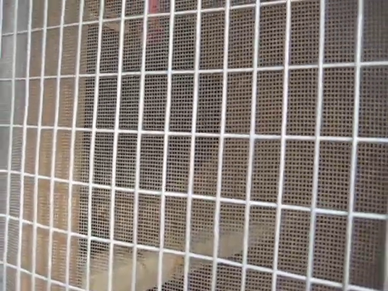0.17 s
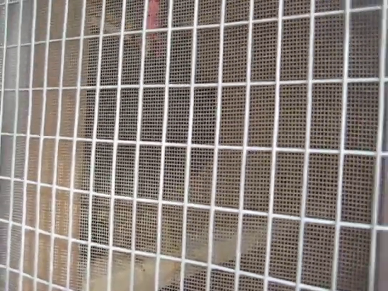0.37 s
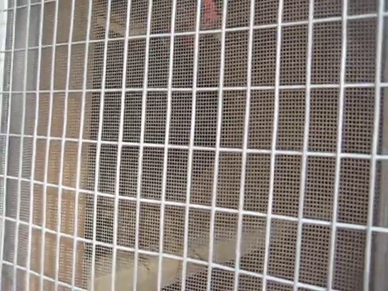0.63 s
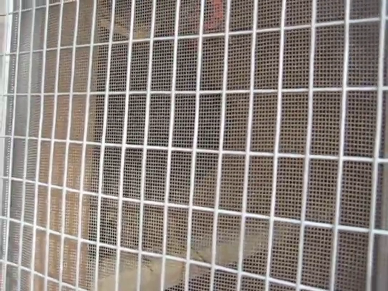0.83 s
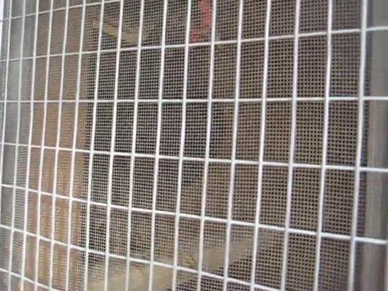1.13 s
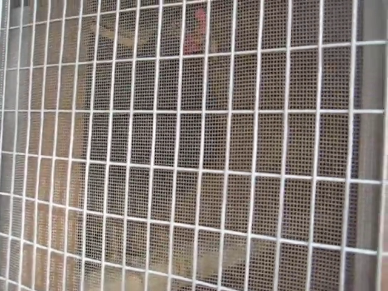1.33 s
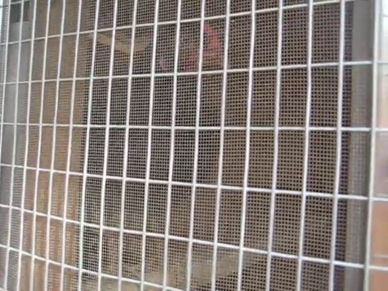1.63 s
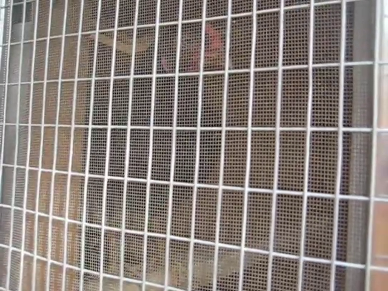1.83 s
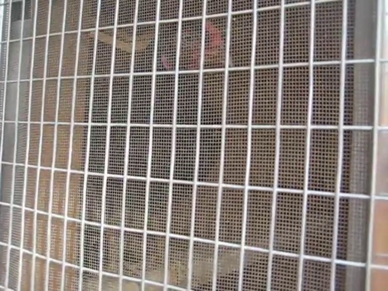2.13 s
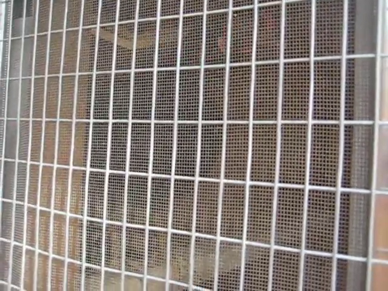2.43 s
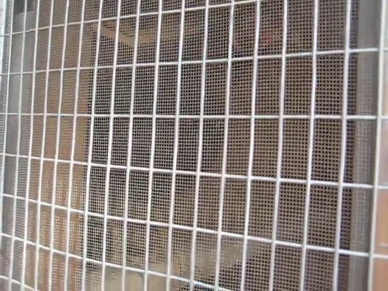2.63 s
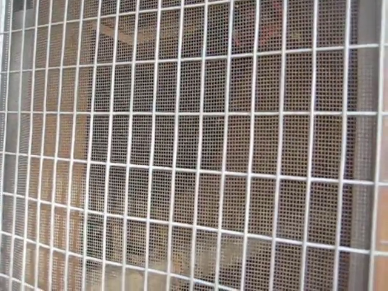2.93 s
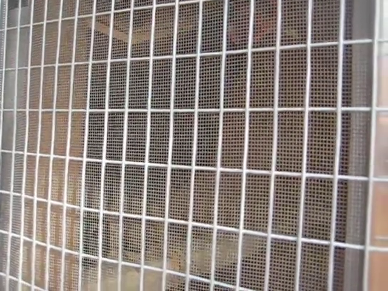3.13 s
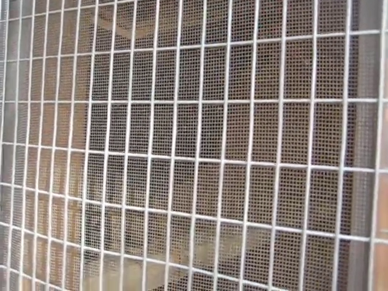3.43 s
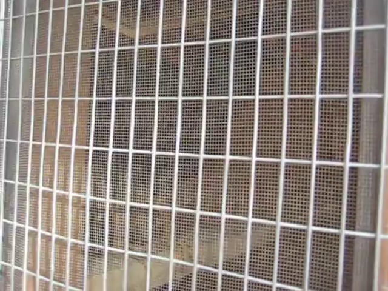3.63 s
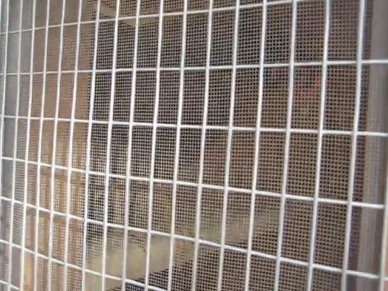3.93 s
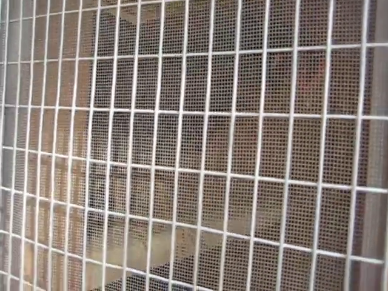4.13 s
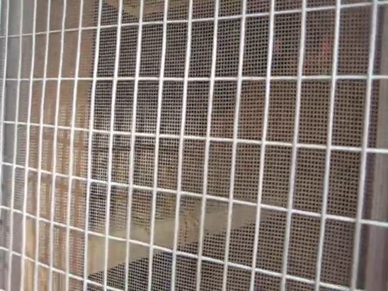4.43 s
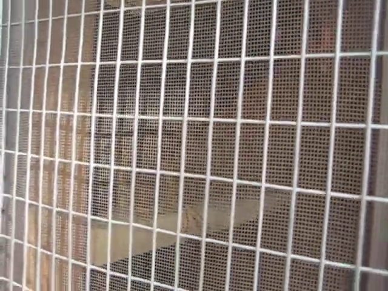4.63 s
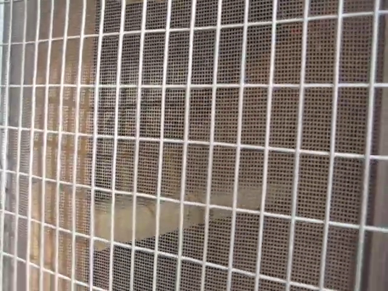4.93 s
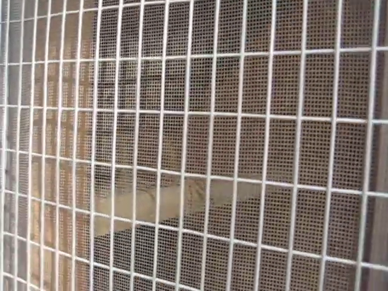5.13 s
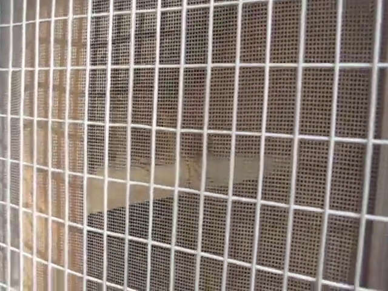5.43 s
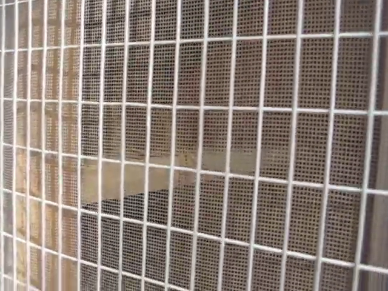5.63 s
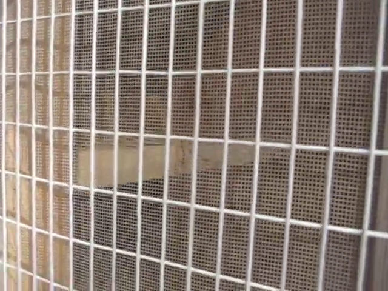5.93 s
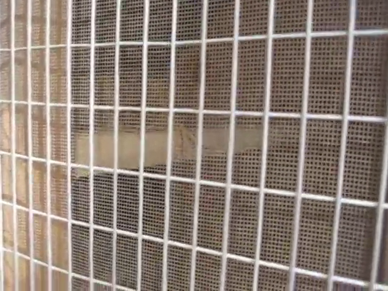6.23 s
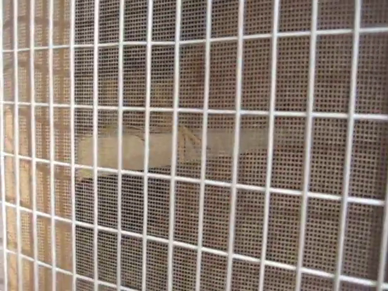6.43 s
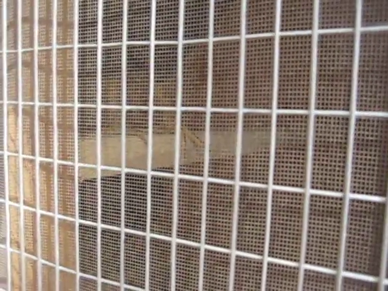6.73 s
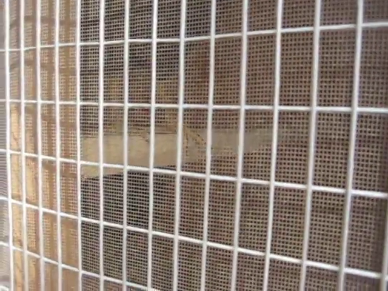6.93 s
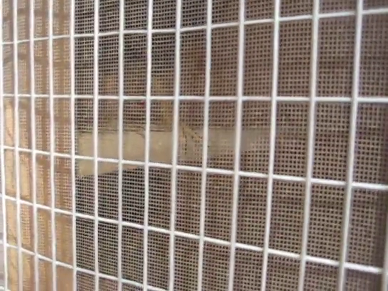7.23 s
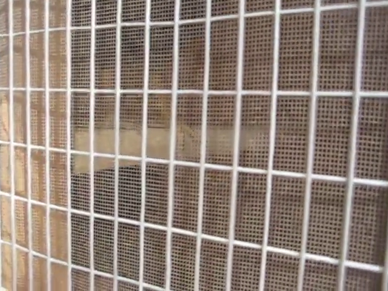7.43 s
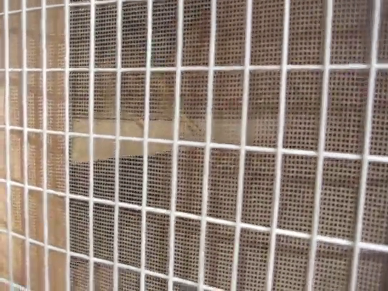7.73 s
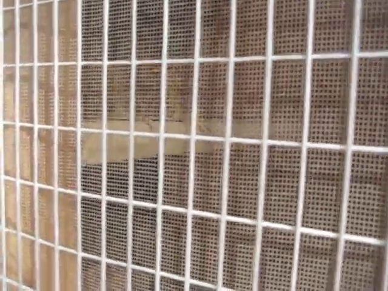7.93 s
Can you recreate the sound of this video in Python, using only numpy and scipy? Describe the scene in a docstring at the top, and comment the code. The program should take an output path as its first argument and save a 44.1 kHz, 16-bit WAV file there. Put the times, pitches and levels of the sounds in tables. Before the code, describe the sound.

Fast hoarse hen clucks give way to cage knocks, thin squeals, harsh squawks and a low growl, with chicks peeping far off.

```python
"""Hens in a small wire-fronted wooden coop. From the start, air noise, an electrical hum and whine and
distant chicks lie under a fast run of hoarse clucks: syrinx pulses filtered by the throat. A nearer chick
peeps, and in a pause beaks and feet knock on the cage. The syrinx then locks into thin squeals, catches
in croaks and, driven harder, breaks into harsh squawks. Low moans and a rasping growl come last.
Throughout, the box reverberates and an automatic gain control ducks each loud call."""
import sys
import numpy as np
from scipy import signal
from scipy.fft import rfft, irfft, next_fast_len
from scipy.io import wavfile
from scipy.ndimage import uniform_filter1d, map_coordinates

SR = 44100
rng = np.random.default_rng(int(sys.argv[2]) if len(sys.argv) > 2 else 0)


def log_audio(samples):
    """Write samples as a 16-bit WAV file to the path given in sys.argv[1]."""
    # one column per channel
    frames = np.atleast_2d(samples).T
    # limit to full scale, then quantise
    limited = np.clip(frames, -1, 1)
    pcm = np.round(limited * 32767).astype(np.int16)
    wavfile.write(sys.argv[1], SR, pcm)


N = 355887
TIME = np.arange(N) / SR


def amp(db):
    """Decibels to amplitude ratio."""
    return 10 ** (np.asarray(db) / 20)


def unit(x):
    """Normalisation to rms 1."""
    return x / np.sqrt(np.mean(x ** 2) + 1e-20)


def along(points, hz):
    """Interpolation of (frequency_hz, value) points on a log axis."""
    known_hz, values = np.transpose(points)
    return np.interp(np.log(hz + 1), np.log(known_hz + 1), values)


def curves(rows, t):
    """Linear interpolation in time of each column after the first."""
    times, *columns = np.transpose(rows)
    return [np.interp(t, times, column) for column in columns]


def span(rows, edge_s):
    """The sample times of a call and its trapezoidal gate."""
    t = np.arange(rows[0][0], rows[-1][0], 1 / SR)
    return t, np.clip(np.minimum(t - t[0], t[-1] - t) / edge_s, 0, 1)


def add(track, start_s, x):
    """Superposition of x on the track."""
    part = track[max(round(start_s * SR), 0):][:len(x)]
    part += x[:len(part)]


def phase_of(pitch_hz):
    """Phase in radians, the integral of frequency."""
    return 2 * np.pi * np.cumsum(pitch_hz) / SR


def wobble(rate, size):
    """Smooth random modulation, rate knots a second."""
    knots = rng.standard_normal(size // 8 + 4)
    return map_coordinates(knots, [np.arange(size) * rate / SR], mode="mirror")


def filtered(x, response):
    """Linear filtering: the spectrum times a frequency response."""
    padded = next_fast_len(len(x) + 8192)
    return irfft(rfft(x, padded) * response(np.fft.rfftfreq(padded, 1 / SR)), padded)[:len(x)]


def resonate(x, modes):
    """Parallel damped resonators of alternating sign: centre_hz, width_hz, gain_db."""
    return filtered(x, lambda f: sum(
        (-1) ** k * amp(db) * 1j * f * width / (hz * hz - f * f + 1j * f * width)
        for k, (hz, width, db) in enumerate(modes)))


def band(x, low_hz, high_hz):
    """Causal band-pass filtering."""
    return signal.sosfilt(signal.butter(3, [low_hz, high_hz], "band", fs=SR, output="sos"), x)


def noise(spectrum, size):
    """Spectral shaping of white noise, at rms 1."""
    return unit(filtered(rng.standard_normal(size), lambda f: amp(along(spectrum, f))))


def retune(x, ratio):
    """Resampling slides pitch and resonances together by a moving ratio."""
    return unit(map_coordinates(x, [np.cumsum(ratio)], mode="mirror"))


def rasp(pitch_hz, rough, size, jitter, shimmer_db, hiss):
    """Jitter and shimmer: syrinx pulses uneven in time and size, each with a puff of turbulence."""
    cycles = np.cumsum(pitch_hz * np.exp(jitter * rough * wobble(400, size))) / SR
    index = cycles.astype(int)
    strength = amp(shimmer_db * rough * np.clip(rng.standard_normal(size), -2, 2))[index]
    puffs = rng.standard_normal(size) * np.exp(-4 * (cycles % 1))
    return unit(strength * (unit(np.diff(index, prepend=0)) + hiss * rough * unit(puffs)))


# outdoor air and hiss: frequency_hz, relative_density_db
AIR_SPECTRUM = [(20, -16), (55, -0.5), (200, 0), (800, -3), (1500, -6), (3000, -14.5), (4400, -12),
                (5800, -18), (6800, -16.5), (7550, -8), (8600, -21.5), (10500, -18), (12500, -28),
                (16000, -37)]
# electrical hum and whine: frequency_hz, level_db
HUM_TONES = [(120, -57), (7560, -57.5), (7590, -81), (11489, -67), (15122, -88), (15150, -68.5)]


def background():
    """A continuous spectrum of outdoor air under a line spectrum of electrical tones."""
    tones = sum(amp(db) * np.sin(2 * np.pi * hz * TIME + 0.19 * wobble(4, N)) for hz, db in HUM_TONES)
    return amp(-42.5) * noise(AIR_SPECTRUM, N) + np.sqrt(2) * tones


# loudness of the distant chicks: time_s, level_db
CHORUS_LEVELS = [(0, -44), (2.3, -45.5), (2.9, -45.5), (4, -45), (5.8, -50), (6.9, -47), (8.07, -47)]


def chicks(count=1000, typical_hz=4605):
    """Incoherent summation: quavering peeps, each a falling arch, merge into a distant chorus."""
    out = np.zeros(N)
    for when, (tune, size, stretch) in zip(rng.random(count), rng.standard_normal((count, 3))):
        length_s = .05 * np.exp(0.27 * stretch)
        progress = np.arange(0, 1, 1 / (SR * length_s))
        quaver = .02 * np.sin(2 * np.pi * 5 * progress)
        arch = 1 - 0.337 * (progress - .35) ** 2
        pitch_hz = typical_hz * (1 + .028 * tune + quaver) * arch
        add(out, when * N / SR, amp(2.3 * size) * np.sin(np.pi * progress) * np.sin(phase_of(pitch_hz)))
    return amp(curves(CHORUS_LEVELS, TIME)[0] + wobble(3.7, N)) * unit(out)


# clucks: start_s, rise_s, length_s, pitch_hz, roughness (0-1), relative_level_db, brightness_db
CLUCK_CALLS = [(0, 0.00067, 0.053, 385.2, 0.91, -19.5, -5), (0.143, 0.011, 0.064, 374.4, 0.73, -15.5, -3.5),
               (0.309, 0.014, .059, 347, 0.86, -16.5, -2), (.482, 0.013, 0.063, 344.6, 0.91, -18, 0),
               (0.661, .016, .072, 341.4, 0.91, -19, -5.5), (0.854, 0.025, .066, 346.5, 0.8, -17.5, -3),
               (1.1, 0.021, 0.07, 369, 0.77, -18, -4), (1.231, .01, .048, 347.6, .85, -17, -8),
               (1.425, 0.024, 0.064, 373, 0.69, -18, -5), (1.66, 0.023, .062, 400, .88, -23.5, -2.5),
               (1.788, 0.033, 0.037, 361.5, 0.42, -14, -7)]
# low, upper (at full gape) and shrill resonances: centre_hz, width_hz, gain_db
CLUCK_LOW_FORMANTS = [(832, 336, -2.5), (1280, 560, -1)]
CLUCK_HIGH_FORMANTS = [(2126, 38, 4), (3000, 400, 3.5), (3730, 537, 3), (5790, 730, -11.5),
                       (7600, 2800, -19)]
CLUCK_EDGE_FORMANTS = [(5530, 450, -16), (6800, 500, -1), (8900, 430, 8), (12800, 3700, -15)]


def clucks():
    """Source and filter: hoarse bursts of pulses excite formants, the upper ones more with effort."""
    out, t = np.zeros(N), np.arange(SR // 5) / SR
    for start_s, rise_s, length_s, pitch_hz, rough, level_db, bright_db in CLUCK_CALLS:
        attack = np.minimum(0.079 + 0.81 * t / rise_s, 1)
        release = np.minimum(amp(-480 * (t - length_s)), 1)
        effort = attack * release * amp(-45 * t)
        arch = 1 - .04 * np.minimum((2 * t / length_s - 1) ** 2, 1)
        pulses = rasp(pitch_hz * arch, rough ** 2, len(t), jitter=.125, shimmer_db=4, hiss=.65)
        low = unit(band(resonate(pulses, CLUCK_LOW_FORMANTS), 130, 2000))
        chest = amp(bright_db - 18) * unit(band(pulses, 236, 1260))
        gape = 1 + 0.013 * bright_db  # a wider beak raises the upper resonances
        formants = [(gape * hz, width, db) for hz, width, db in CLUCK_HIGH_FORMANTS]
        high = unit(band(resonate(pulses, formants), 680, 10500))
        shrill = unit(band(resonate(pulses, CLUCK_EDGE_FORMANTS), 4900, 20000))
        edge = amp(0.76 * bright_db - 20) * effort * shrill
        treble = amp(bright_db + 2.5) * effort ** 2 * (high + edge)
        add(out, start_s, amp(level_db) * (effort * (low + chest) + treble))
    return out


# peeps of a nearer chick: start_s, level_db
PEEP_CALLS = [(1.021, -43), (2.2, -48), (2.87, -42), (3.53, -50)]


def peeps(length_s=0.065, top_hz=4400, fall_hz_per_s=6500):
    """Linear chirps: single falling notes stand out from the chorus."""
    out, t = np.zeros(N), np.arange(0, length_s, 1 / SR)
    envelope = np.sqrt(2) * np.sin(np.pi * t / length_s)
    for start_s, level_db in PEEP_CALLS:
        pitch_hz = (top_hz - fall_hz_per_s * t) * (1 + 0.014 * wobble(148, len(t)))
        add(out, start_s, amp(level_db) * envelope * np.sin(phase_of(pitch_hz)))
    return out


# blows on the cage: start_s, level_db, relative_thud_db, t60_s
CAGE_BLOWS = [(2.374, -41, -13, 0.072), (3.022, -64, 15, 0.29), (3.42, -19.5, -27, 0.036),
              (3.649, -41, -9, 0.077), (4.048, -52.5, 14, 0.22), (4.109, -36, -2.5, 0.12),
              (4.158, -29.5, -8, 0.2), (4.175, -39.5, -0.5, 0.2), (4.691, -30, -11, 0.11),
              (4.718, -25, -14, 0.046)]
# struck wire mesh and boards: frequency_hz, relative_density_db
MESH_SPECTRUM = [(530, -47), (900, -19), (1360, 1), (1470, 16), (1600, 13), (2710, 20), (3250, 15.5),
                 (3600, 21), (4000, 13.5), (5720, 7), (14000, -11.5)]
BOARD_SPECTRUM = [(60, -30), (180, 5), (400, 0), (750, 7), (1500, -6.5), (3000, -83)]


def knocks():
    """Impact and exponential decay: beaks and feet rattle the mesh and thud on the boards."""
    out, t = np.zeros(N), np.arange(SR // 4) / SR
    attack = 1 - np.exp(-t / 0.0013)
    for start_s, level_db, thud_db, t60_s in CAGE_BLOWS:
        blow = noise(MESH_SPECTRUM, len(t)) + amp(thud_db) * noise(BOARD_SPECTRUM, len(t))
        add(out, start_s, amp(level_db - 60 * t / t60_s) * attack * blow)
    return out


# one contour for each squeal: time_s, pitch_hz, relative_level_db, relative_overtone_db
SQUEAL_CONTOURS = [
    [(4.2, 1307, -40, -7), (4.324, 1396, -41, -9), (4.41, 1277, -41, -12)],
    [(4.44, 1224, -28, -8), (4.452, 1223, -29, -7), (4.572, 1420, -18, -9), (4.602, 1394, -24, -8),
     (4.624, 1379, -10, -20.5), (4.662, 1382, -19, -22), (4.676, 1318, -30, -13), (4.69, 1190, -31, -12)],
    [(4.845, 1187, -16.5, -25), (4.865, 1225, -15.5, -25), (4.875, 1513, -27, -22), (4.897, 1524, -22, -26),
     (5.023, 1430, -35.5, -9), (5.055, 1470, -28.5, -19), (5.085, 1562, -26, -28),
     (5.131, 1486, -23, -15.5), (5.171, 1526, -27.5, -28), (5.187, 1057, -32.5, -23), (5.2, 1020, -28, -31)],
    [(5.333, 1220, -19, -28), (5.369, 1148, -18, -28), (5.389, 1411, -24, -11), (5.409, 1315, -23, -16),
     (5.455, 1530, -20.5, -6), (5.467, 1365, -23, -11), (5.479, 1270, -14.5, -25), (5.488, 1160, -20, -28)],
]


def squeals(crack_hz_per_s=11800):
    """Self-sustained oscillation: the syrinx holds one high tone, which cracks where it slides fast."""
    out = np.zeros(N)
    for contour in SQUEAL_CONTOURS:
        t, gate = span(contour, edge_s=0.0013)
        pitch_hz, level_db, overtone_db = curves(contour, t)
        slide = np.abs(uniform_filter1d(np.gradient(pitch_hz, t), size=SR // 50))
        rough = np.minimum(0.035 + slide / crack_hz_per_s, 1)
        tremble = .055 * rough * wobble(330, len(t)) + .008 * wobble(50, len(t))
        flutter = amp(4.3 * rough * wobble(222, len(t)))
        phase = phase_of(pitch_hz * (1 + tremble))
        overtones = np.sin(2 * phase) + amp(-23.5 + 26.5 * rough) * np.sin(3 * phase)
        tone = np.sin(phase) + amp(overtone_db - 0.3) * overtones
        add(out, t[0], np.sqrt(2) * gate * flutter * amp(level_db + 1.05) * tone)
    return out


# croaks that lead into a squeal: start_s, length_s, level_db
CROAK_CALLS = [(4.815, 0.038, -21), (5.244, 0.079, -17.5)]
# throat resonances: centre_hz, width_hz, gain_db
CROAK_FORMANTS = [(650, 94, 1), (1174, 200, 3), (1760, 165, -9.5), (2840, 360, -26.5), (3730, 360, -29)]


def croaks(pitch_hz=290, release_db_per_s=900):
    """Aperiodic onset: the voice catches in a low rattle before the tone takes hold."""
    out, t = np.zeros(N), np.arange(SR // 5) / SR
    for start_s, length_s, level_db in CROAK_CALLS:
        effort = np.minimum(t / .002, 1) * amp(-release_db_per_s * np.maximum(t - length_s, 0))
        pulses = rasp(pitch_hz, 1, len(t), jitter=.2, shimmer_db=3, hiss=.6)
        voice = unit(band(resonate(pulses, CROAK_FORMANTS), 450, 5100))
        add(out, start_s, amp(level_db) * effort * voice)
    return out


# squawks: start_s, length_s, top_pitch_hz, relative_level_db, brightness_db, edge_db
SQUAWK_CALLS = [(5.482, 0.0192, 1093, -19, -36, -40), (5.568, 0.2, 1188, -19.5, -12.5, -30),
                (5.762, 0.02, 1121, -20, -17, -38), (5.843, 0.17, 1180, -18, -13, -35),
                (6.089, 0.17, 1131, -20.5, -9.5, -32), (6.339, .155, 1106, -20.5, -7.5, -25.5),
                (6.569, 0.14, 1096, -21, -7, -24), (7.055, 0.092, 1079, -19, -15, -22.5)]
# moments when a squawk locks into a clear tone: start_s, length_s
TONE_LOCKS = [(5.644, 0.014), (5.73, 0.032), (5.929, 0.0494)]
# throat, beak and shrill resonances at the rest pitch: centre_hz, width_hz, gain_db
SQUAWK_LOW_FORMANTS = [(622, 99, -7), (808, 103, 3), (1146, 131, 5.5), (1780, 600, -32)]
SQUAWK_HIGH_FORMANTS = [(2460, 670, 5), (3350, 91, 22), (4500, 250, -12), (7700, 13000, -24)]
SQUAWK_EDGE_FORMANTS = [(4450, 200, 7.5), (6660, 540, -4), (9300, 1400, -10)]


def squawks(rest_hz=1140, release_db_per_s=348, lock_edge_s=.015):
    """Subharmonics: driven harder, the tone breaks into uneven pulses at a third of its pitch."""
    out, t = np.zeros(N), np.arange(SR // 3) / SR
    inside_s = np.max([np.minimum(TIME - s, s + length - TIME) for s, length in TONE_LOCKS], axis=0)
    locked = np.clip(inside_s / lock_edge_s + 1, 0, 1)
    onset, swell = np.minimum(t / .002, 1), np.interp(t, [0, 0.017], [0.72, 1])
    settling = .46 + .54 * np.exp(-t / .085)  # starts fully rough, settles towards a tone
    for start_s, length_s, top_hz, level_db, bright_db, edge_db in SQUAWK_CALLS:
        effort = swell * amp(-release_db_per_s * np.maximum(t - length_s, 0))
        crest_s = .45 * length_s
        pitch_hz = top_hz * (1 - .045 * np.minimum((t / crest_s - 1) ** 2, 2))
        rough = settling + (.08 - settling) * np.interp(start_s + t, TIME, locked)
        broken = np.sin(np.pi / 2 * np.clip(rough, 0, 1)) ** 2  # flips quickly from clear to broken
        phase = phase_of(pitch_hz * (1 + (.007 + .042 * broken) * wobble(350, len(t))))
        pulses = rasp(rest_hz / 3, 1, len(t), jitter=0.14, shimmer_db=3.5, hiss=0.45)
        tuning = pitch_hz / rest_hz
        throat = retune(band(resonate(pulses, SQUAWK_LOW_FORMANTS), 454, 2620), tuning)
        beak = retune(band(resonate(pulses, SQUAWK_HIGH_FORMANTS), 1370, 10200), tuning)
        edge = retune(band(resonate(pulses, SQUAWK_EDGE_FORMANTS), 4000, 12400), tuning)
        clear = np.sqrt(2 * (1 - broken ** 2)) * amp(3 * broken * wobble(160, len(t)))
        overtones = amp(-6.5) * np.sin(3 * phase) + amp(-10) * (1 - broken) ** 2 * np.sin(2 * phase)
        low = broken * throat + clear * np.sin(phase)
        high = np.sqrt(broken) * beak + clear * overtones
        treble = effort * (amp(bright_db) * high + amp(edge_db) * broken * edge)  # dulls as it dies
        add(out, start_s, onset * effort * amp(level_db + 3.5) * (low + treble))
    return out


# moans: start_s, length_s, first_pitch_hz, last_pitch_hz, level_db
MOAN_CALLS = [(6.762, 0.3, 538, 689, -39.5), (7.63, 0.073, 799, 830, -26.5),
              (7.837, 0.078, 984, 1018, -26.5), (7.874, 0.114, 1234, 1255, -36.5)]


def moans():
    """Frequency glides: soft, nearly pure notes that rise ever faster."""
    out = np.zeros(N)
    for start_s, length_s, first_hz, last_hz, level_db in MOAN_CALLS:
        t, gate = span([[start_s], [start_s + length_s]], edge_s=0.012)
        pitch_hz = first_hz + (last_hz - first_hz) * ((t - start_s) / length_s) ** 1.3
        phase = phase_of(pitch_hz * (1 + 0.017 * wobble(145, len(t))))
        tone = np.sin(phase) + amp(-25) * np.sin(2 * phase)
        add(out, start_s, gate * amp(level_db + 1.6 * wobble(85, len(t))) * tone)
    return out


# swell of the growl: time_s, level_db
GROWL_LEVELS = [(6.78, -46.5), (7.012, -37), (7.174, -37.5), (7.562, -32), (7.854, -31.5), (8.07, -28.5)]
# opening of the throat: time_s, tuning_ratio
GROWL_TUNING = [(6.8, 0.93), (7.3, 0.97), (7.65, 0.97), (7.9, 1.1), (8.07, 0.97)]
# throat resonances at ratio 1: centre_hz, width_hz, gain_db
GROWL_FORMANTS = [(520, 1200, -49), (810, 177, 6), (1245, 130, 3), (1446, 100, 0.5), (2420, 300, -8.5),
                  (3540, 410, -12)]


def growl(rest_hz=145):
    """Pulse register: slow creaking pulses, whose rate and formants rise as the throat opens."""
    t, gate = span(GROWL_LEVELS, edge_s=0.0031)
    level_db = curves(GROWL_LEVELS, t)[0]
    tuning = curves(GROWL_TUNING, t)[0]
    pulses = rasp(rest_hz, 1, len(t), jitter=.35, shimmer_db=2.5, hiss=.6)
    voice = retune(band(resonate(pulses, GROWL_FORMANTS), 160, 5000), tuning)
    out = np.zeros(N)
    add(out, t[0], amp(level_db) * gate * voice)
    return out


# reverberation time of the coop: frequency_hz, t60_s
COOP_DECAY = [(200, 0.35), (1000, 0.15), (3000, 0.11), (9000, 0.035)]
# modes of the box: centre_hz, width_hz, gain_db
BOX_MODES = [(490, 69, 9.5), (752, 10, -9.5), (867, 14.3, 12.5), (1083, 41, -3), (1217, 41, 10),
             (1393, 66, 13), (1568, 8.7, -74), (2038, 32, 11), (2700, 53, -24)]


def coop(x, wet_db, ring_db):
    """Reverberation and normal modes: close walls answer, differently as birds move, and the box rings."""
    echo, hop = np.zeros(N), SR // 3
    for centre in range(0, N, hop):  # crossfade from one random tail to the next
        hz, t, spectra = signal.stft(rng.standard_normal(SR // 3), SR, nperseg=256)
        decay = amp(-60 * t / along(COOP_DECAY, hz)[:, None])
        tail = signal.istft(spectra * decay, SR, nperseg=256)[1]
        first = max(centre - hop, 0)
        piece = x[first:centre + hop]
        share = np.clip(1 - np.abs(first + np.arange(len(piece)) - centre) / hop, 0, 1)
        add(echo, first / SR + .002, signal.fftconvolve(piece * share, tail / np.linalg.norm(tail)))
    ring = amp(ring_db) * resonate(x, BOX_MODES)
    return (x + amp(wet_db) * echo + ring) / np.sqrt(1 + amp(wet_db) ** 2)


def scene():
    """Superposition of birds, coop and background; clucks and knocks ring the box most."""
    transients = coop(amp(1.5) * clucks() + knocks(), wet_db=0.5, ring_db=-1)
    voices = croaks() + squeals() + amp(1) * squawks() + growl() + moans() + chicks() + peeps()
    return (transients + coop(voices, wet_db=-4, ring_db=-11) + background())[None]


def record(dry, averaging_s=0.025, knee_db=-16, ceiling=.75, top_hz=15750):
    """Dynamic compression: gain control ducks loud calls, then peaks are rounded and the band limited."""
    pole = np.exp(-1 / (averaging_s * SR))
    power = signal.lfilter([1 - pole], [1, -pole], dry[0] ** 2)
    ducked = dry[0] * (1 + power / amp(knee_db) ** 2) ** -.4
    rounded = ducked / (1 + (ducked / ceiling) ** 4) ** .25
    return filtered(rounded, lambda hz: hz < top_hz)[None]


dry = scene()
out = record(dry)
log_audio(out)
```